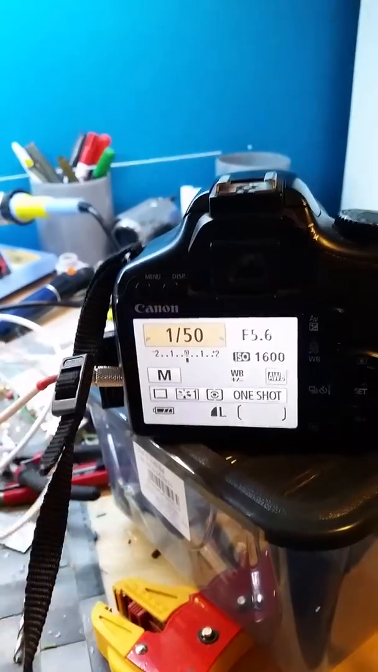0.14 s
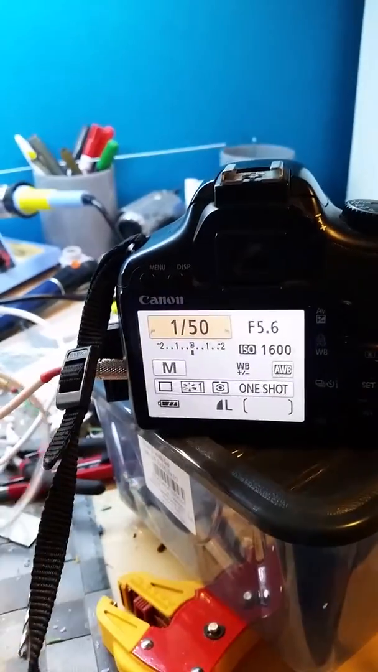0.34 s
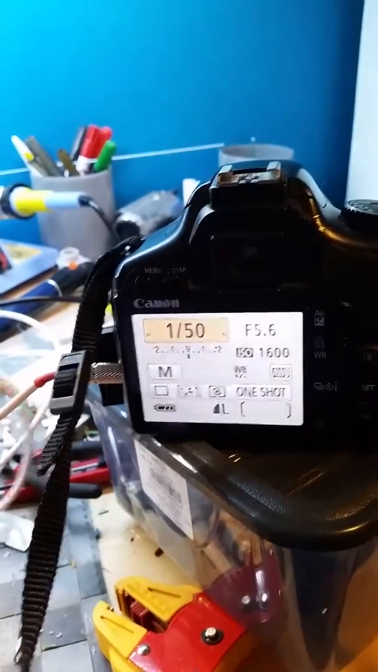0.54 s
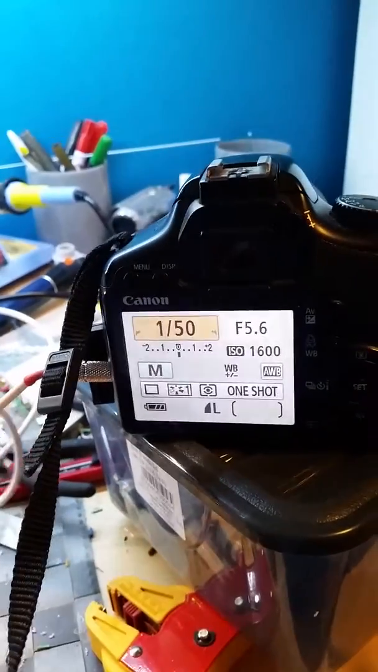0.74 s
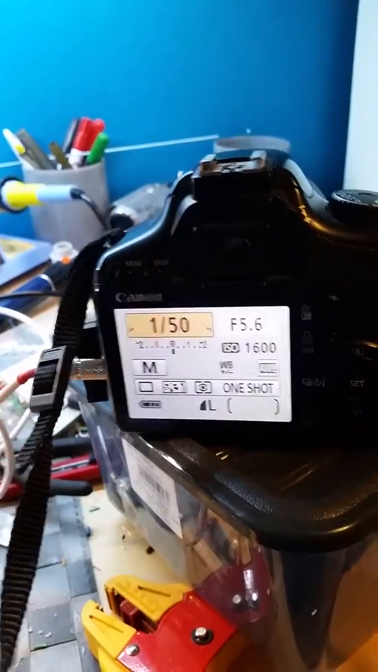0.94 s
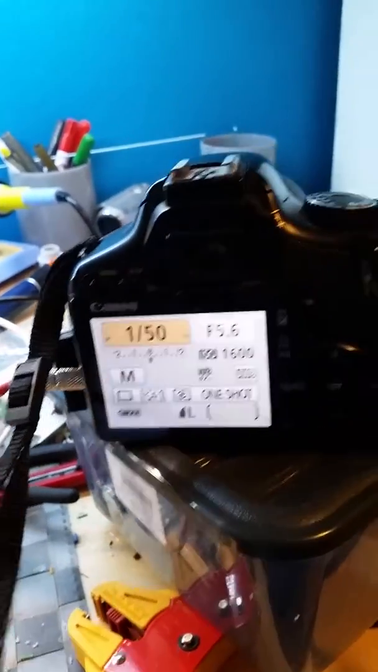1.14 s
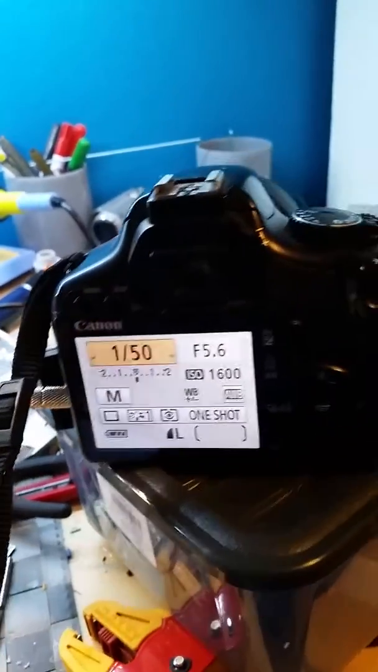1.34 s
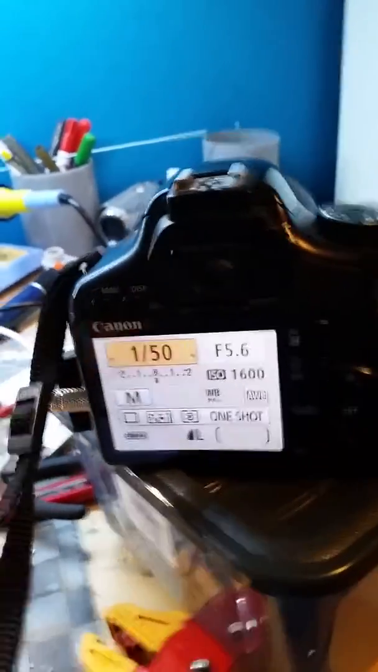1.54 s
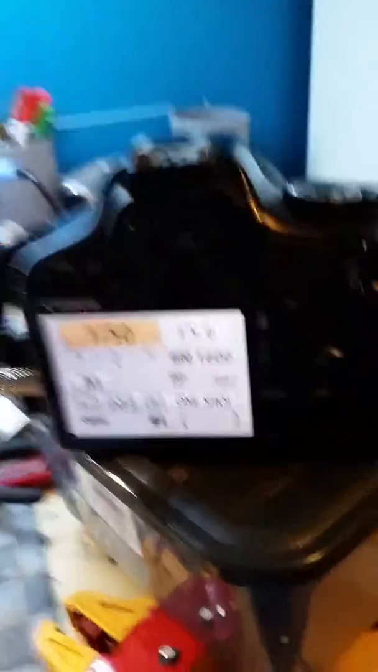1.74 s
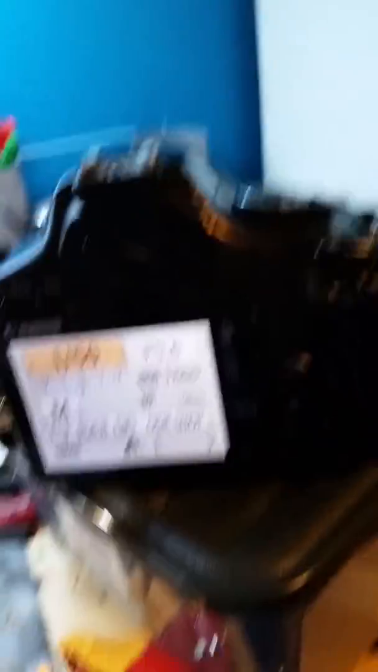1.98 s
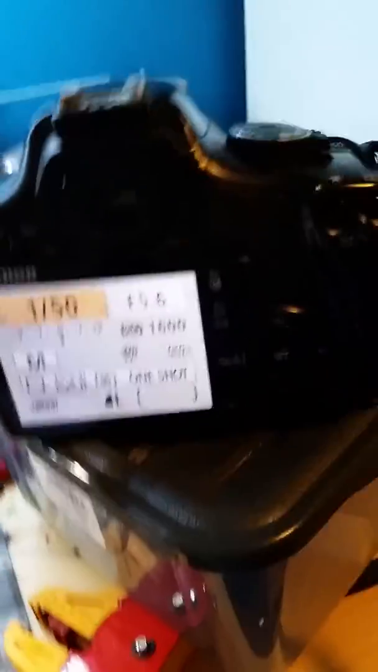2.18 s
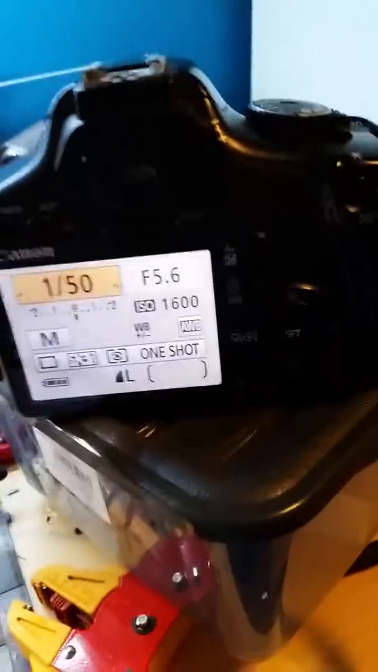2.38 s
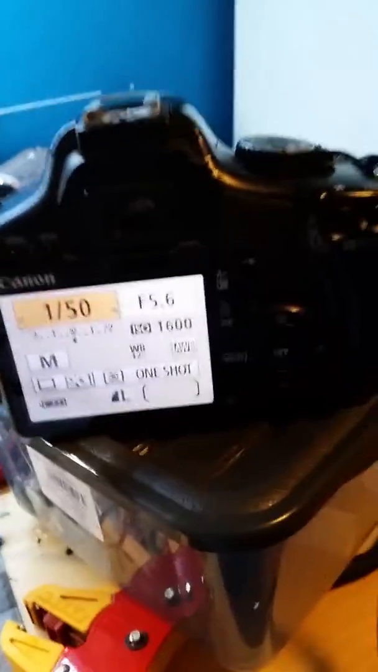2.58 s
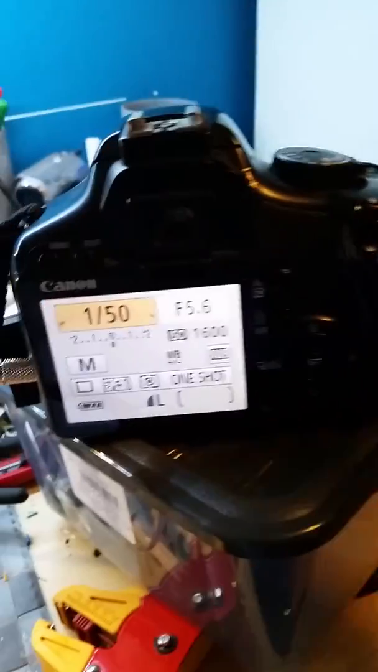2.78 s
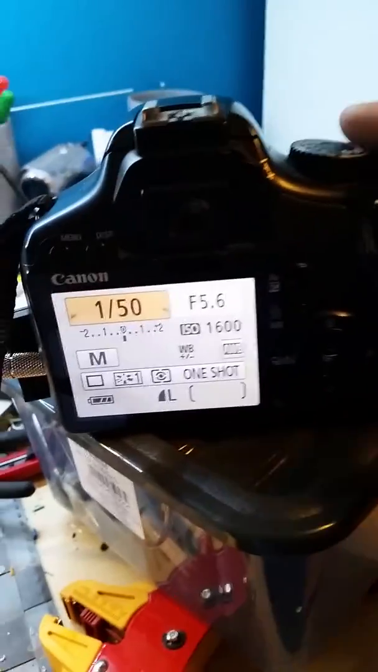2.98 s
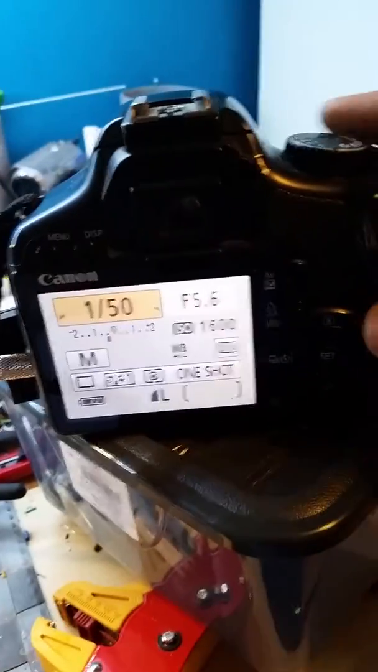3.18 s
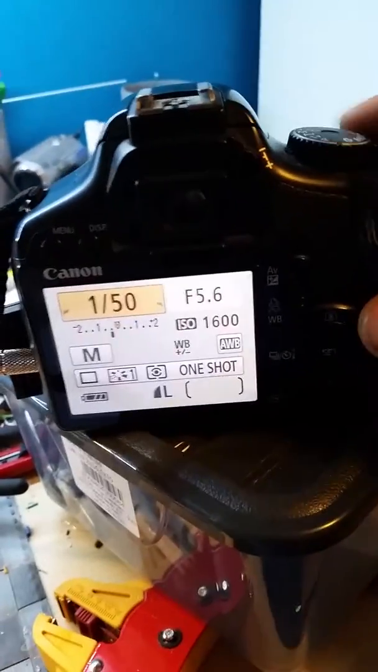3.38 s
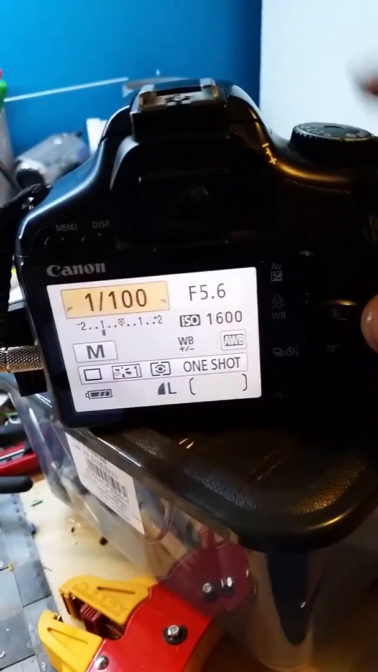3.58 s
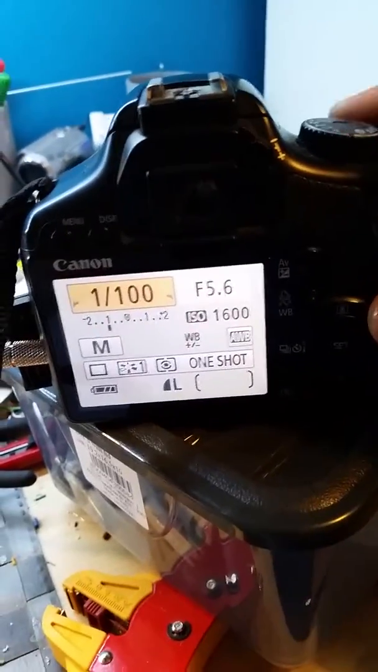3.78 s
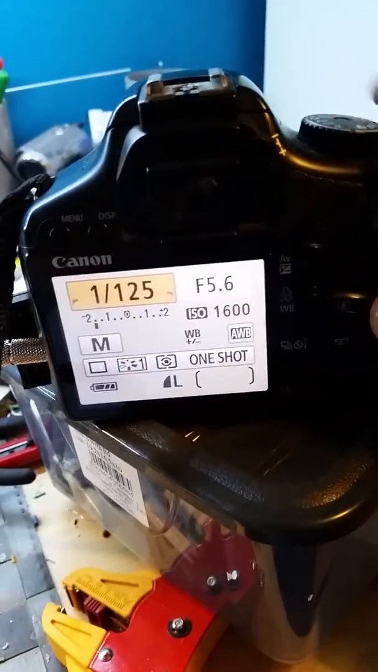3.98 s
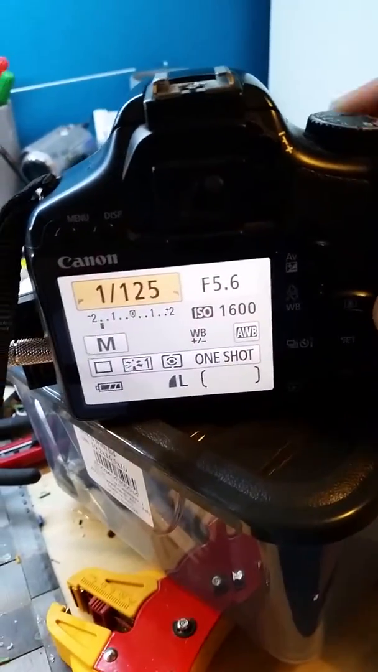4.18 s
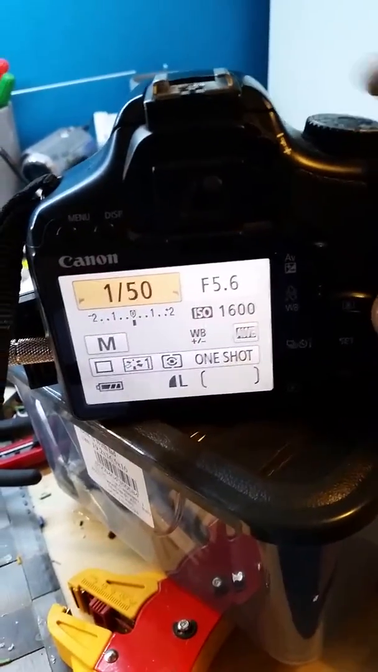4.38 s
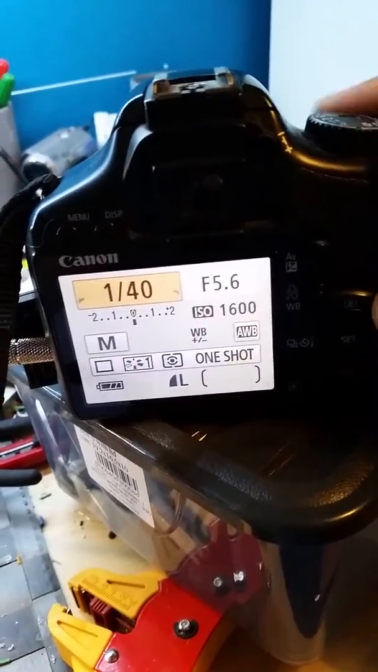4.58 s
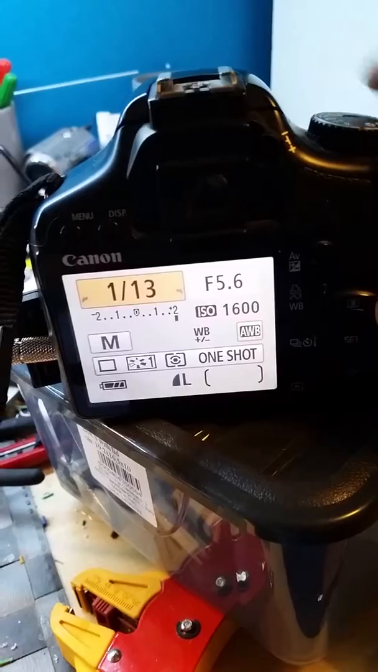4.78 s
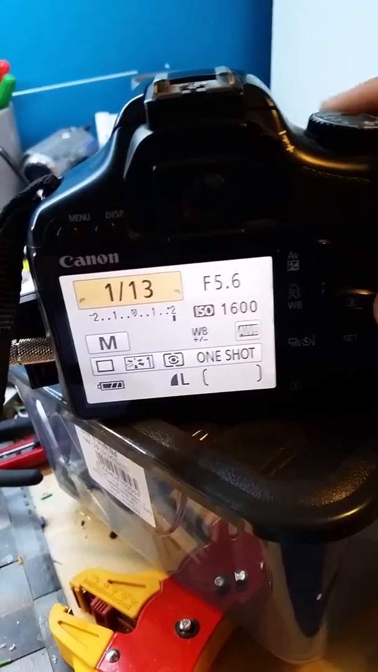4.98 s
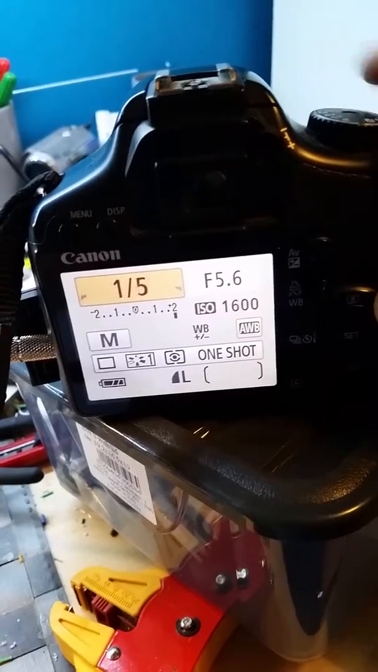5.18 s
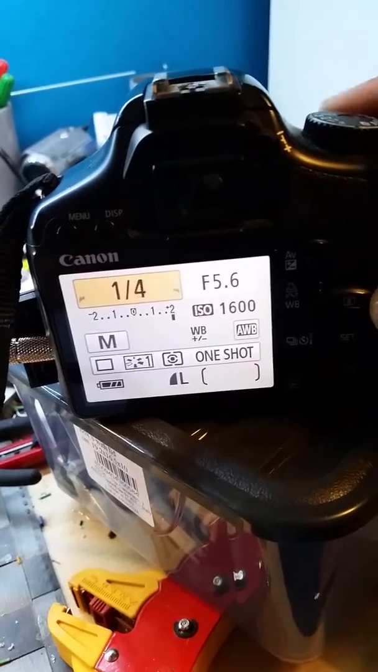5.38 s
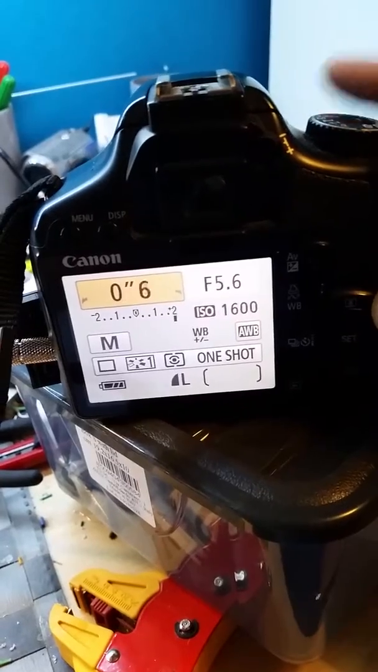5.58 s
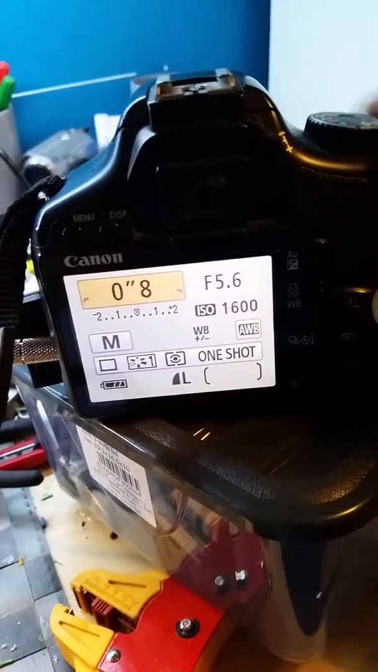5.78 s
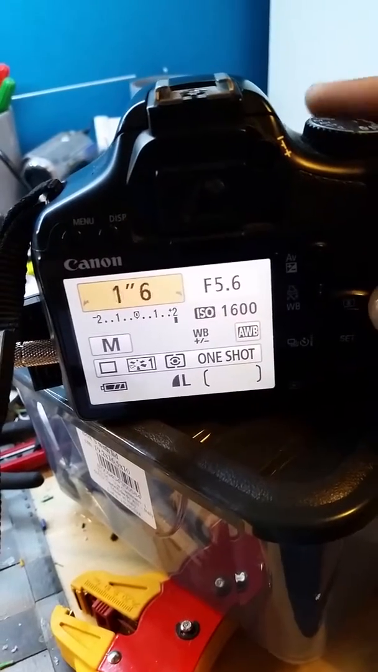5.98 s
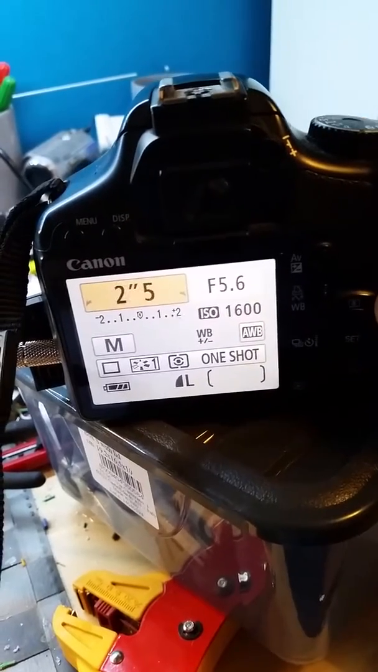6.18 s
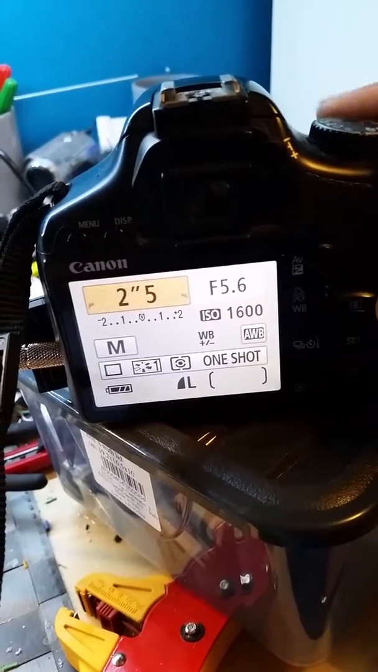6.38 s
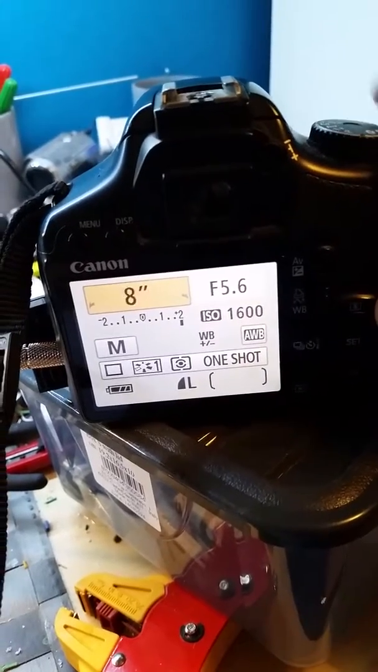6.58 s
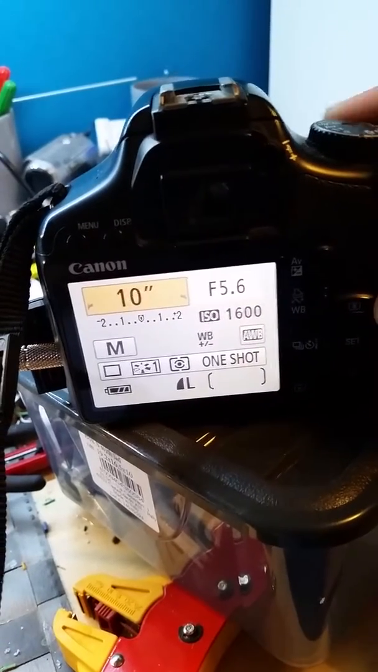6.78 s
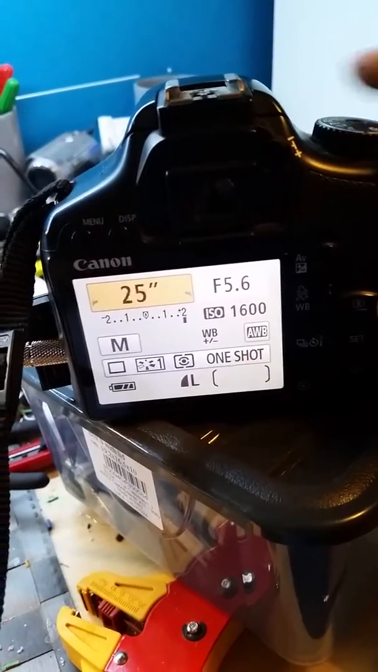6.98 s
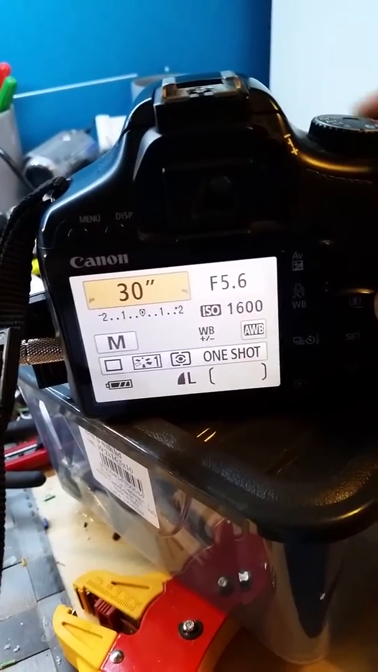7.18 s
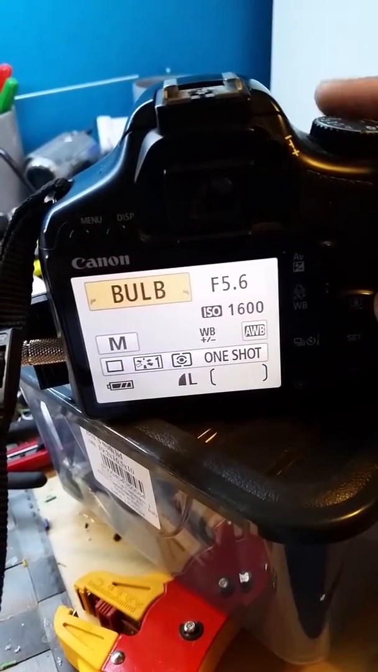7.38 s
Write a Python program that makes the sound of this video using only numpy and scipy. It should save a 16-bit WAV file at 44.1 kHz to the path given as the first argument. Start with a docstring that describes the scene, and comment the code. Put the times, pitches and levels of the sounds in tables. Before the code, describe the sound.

A hollow tub is tapped, the hand-held microphone is rubbed and bumped, then a control dial clicks round in quick short bursts.

```python
"""Room rumble, a wavering hum and microphone hiss lie under everything heard by a hand-held phone's two ports.
First a camera standing on a hollow plastic tub is tapped: the tub booms and its lid rattles.
Then fingers shift on the phone: noise slides along its shell, short swings bump it, pulses pop the right port.
Pops go on while the camera's dial rolls in short runs of clicks, each a snap that rings camera, lid, tub and room.
Near the end a finger drags once on the camera, a short burst of rough noise."""
import sys
import numpy as np
from scipy.fft import rfft, irfft, next_fast_len
from scipy.io import wavfile
from scipy.ndimage import map_coordinates

SR = 44100
rng = np.random.default_rng(int(sys.argv[2]) if len(sys.argv) > 2 else 0)


def generate_wav(signal):
    """Clip the signal to [-1, 1] and save it as 16-bit WAV at the path in sys.argv[1]."""
    frames = np.transpose(np.atleast_2d(signal))
    scaled = np.clip(frames, -1, 1) * 32767
    pcm = np.round(scaled).astype(np.int16)
    wavfile.write(sys.argv[1], SR, pcm)


N = 328104  # length in samples


def amp(db):
    """Turn a level in dB into a gain."""
    return 10 ** (np.asarray(db) / 20)


def unit(x):
    """Scale x to an rms of 1."""
    return x / np.sqrt(np.mean(x ** 2) + 1e-20)


def along(points, hz):
    """Read each column after the frequency, on a log frequency axis."""
    f, *columns = np.transpose(points)
    return np.array([np.interp(np.log(hz + 1), np.log(f + 1), column) for column in columns])


def curves(rows):
    """Draw each column after the time as one value per sample."""
    s, *columns = np.transpose(rows)
    return [np.interp(np.arange(N) / SR, s, column) for column in columns]


def wobble(rate):
    """Draw a smooth random curve through rate random points a second."""
    points = rng.standard_normal(int(N * rate / SR) + 4)
    return map_coordinates(points, [np.arange(N) * rate / SR])


def shape(start, end, rise, fall):
    """A gain that climbs rise dB/s until start, holds, and drops fall dB/s after end."""
    t = np.arange(N) / SR
    return amp(-np.abs(rise) * np.maximum(start - t, 0) - np.abs(fall) * np.maximum(t - end, 0))


def filtered(x, response):
    """Multiply the spectrum of x by a response that depends on frequency."""
    m = next_fast_len(N + SR // 2)
    return irfft(rfft(x, m) * response(np.fft.rfftfreq(m, 1 / SR)), m)[..., :N]


def noise(spectrum):
    """Coloured noise, unrelated at the two ports, with a joint rms of 1."""
    return unit(filtered(rng.standard_normal((2, N)), lambda hz: amp(along(spectrum, hz))))


def add(track, s, sound):
    """Mix a short sound into the track at s seconds."""
    part = track[..., round(s * SR):round(s * SR) + sound.shape[-1]]
    part += sound[..., :part.shape[-1]]


def sides(pan_db):
    """Left and right gains; pan_db is left minus right."""
    return amp(np.array([pan_db, -pan_db]) / 2)


def ring(modes, t, scatter_db):
    """A struck object sounds several fading tones, with new random phases for every blow."""
    hz, left_db, right_db, t60, rise = np.transpose(modes)[..., None]
    level = np.array([left_db, right_db]) + scatter_db * rng.standard_normal((2,) + hz.shape)
    detune = 1 + 0.028 * rng.standard_normal(hz.shape)  # each tone's pitch varies at random from blow to blow
    wave = np.sin(2 * np.pi * (hz * detune * t + rng.random((2,) + hz.shape)))
    envelope = amp(level - 60 * t / t60) * (1 - np.exp(-t / rise))
    return np.sum(envelope * wave, axis=1)


# Rumble and hiss over time, relative levels: start_s, rumble_db, hiss_db
GROUND_LEVELS = [(0, -60.5, -79.5), (.45, -62.5, -76.5), (.75, -46.5, -67.5), (1.12, -57, -73.5),
                 (1.75, -53, -73.5), (2.1, -42.5, -60), (2.28, -44, -66), (2.4, -53.5, -77),
                 (3.02, -61, -84.5), (3.44, -53.5, -83), (3.65, -51.5, -73), (4.39, -53, -67.5),
                 (5.6, -55.5, -73), (6.38, -48, -67), (6.55, -55, -69.5), (7.25, -58.5, -74.5),
                 (7.44, -47.5, -71)]
# Colour of the rumble: pitch_hz, left_db, right_db
RUMBLE_COLOUR = [(24.9, -15.5, -0.5), (50.4, -8, 0), (86, -1, 0.5), (120.2, 0, 0), (170, -6, -3),
                 (270, -2, -1), (378, -10.5, -9), (506, -21, -15.5), (778, -28.5, -23), (1130, -34, -34.5)]
# Colour of the hiss: pitch_hz, left_db, right_db
HISS_COLOUR = [(665, -12, -9), (1350, -26, -21.5), (1873, -5, -10.5), (2740, -14, -14.5), (3190, -20, -17),
               (3820, 5.5, -8), (4626, -17, -16), (6200, -35.5, -27.5), (6470, -23.5, -16),
               (9000, -20.5, -22.5), (10000, -53, -45.5), (12000, -18, -20), (13200, -20.5, -27),
               (14400, -37, -27)]
# How alike the rumble is at the two ports: pitch_hz, likeness (1 = the same)
RUMBLE_LIKENESS = [(60, 0.16), (130, 0.73), (290, 0.94), (640, 0.38), (1400, .03)]
# Colour of the steady top of the hiss: pitch_hz, left_db, right_db
FIZZ_COLOUR = [(5100, -20, -6), (8000, -6.5, -14.5), (9830, -4.5, -4), (13000, 3, 5.5)]
# Colour of the swelling hiss near 2 kHz: pitch_hz, left_db, right_db
SWELL_COLOUR = [(1530, -25, -35), (1950, 3, -10), (2400, -28, -23), (3000, -33, -34)]
# Hiss swells: peak_s, level_db
HISS_SWELLS = [(.85, -72.5), (1.45, -70.5)]
SWELL_RISE, SWELL_FALL = 120, 105  # dB/s


def ground():
    """Low noise partly shared by the ports is the room rumble; separate noise at each port is the hiss."""
    rumble_db, hiss_db = curves(GROUND_LEVELS)

    def share(hz):
        turn = np.arccos(np.clip(along(RUMBLE_LIKENESS, hz)[0], -1, 1)) / 2
        return np.array([np.cos(turn), np.sin(turn)])

    # a shared part and an opposed part, mixed to give the wanted likeness
    mid, side = filtered(rng.standard_normal((2, N)), share)
    colour = RUMBLE_COLOUR + [(4000, -74, -56.0)]
    rumble = unit(filtered(np.array([mid + side, mid - side]), lambda hz: amp(along(colour, hz))))
    rumble = amp(rumble_db - 1.0 + 2.68 * wobble(12)) * rumble
    hiss = amp(hiss_db + 3.5 + 2.03 * wobble(24)) * noise([(300, -29.5, -19.5)] + HISS_COLOUR)
    swell_gain = sum(amp(db) * shape(s, s, SWELL_RISE, SWELL_FALL) for s, db in HISS_SWELLS)
    swell = swell_gain * noise(SWELL_COLOUR)
    fizz = amp(-91.5) * noise(FIZZ_COLOUR)
    return rumble + hiss + swell + fizz


# Swells of the hum on two notes, relative levels: start_s, end_s, pitch_hz, level_db
HUM_SWELLS = [(.8, 0.987, 278, -62.5), (1.1, 1.5, 212, -64.5), (3.575, 3.856, 278, -57.5),
              (4.2, 4.35, 212, -60), (4.5, 4.884, 212, -56), (5.18, 5.4, 278, -59),
              (5.544, 5.794, 212, -59.5), (6.03, 6.35, 278, -53.5), (6.423, 6.505, 278, -55),
              (6.696, 6.792, 278, -59)]
THIN_HZ, THIN_DB = 593, -83  # a faint steady tone; its level wavers around this


def hum():
    """Low, slightly unsteady sine tones fade in and out over one faint tone that stays on."""
    t = np.arange(N) / SR
    out = amp(THIN_DB + 1.5 * wobble(7.5)) * np.sin(2 * np.pi * THIN_HZ * t + 0.4 * wobble(8))
    for start, end, hz, db in HUM_SWELLS:
        progress = np.clip((t - start) / (end - start), 0, 1)
        fade = np.sqrt(np.abs(np.sin(np.pi * progress)))
        tone = np.sin(2 * np.pi * hz * t + 0.61 * wobble(15))
        out = out + amp(db + 4.0 + 1.9 * wobble(14)) * fade * tone
    return out


# Bumps on the phone's shell, relative levels:
# start_s, level_db, pitch_hz, direction (push 1, pull -1), left_minus_right_db, crack_db
SHELL_BUMPS = [(1.631, -28, 63, 1, -21, -55), (1.642, -28, 115, 1, 17, -47),
               (1.654, -25, 252, -1, 8.5, -57), (1.707, -21.5, 117, -1, 11.5, -36.5),
               (1.7246, -29, 64.5, 1, 9.5, -54.5), (1.762, -29, 220, 1, 11, -54),
               (1.803, -22, 326, -1, 4.5, -36.5), (1.8862, -27, 252, 1, 8, -34.5),
               (1.895, -27.5, 109, 1, 9.5, -59), (1.929, -31, 170, -1, 7, -55),
               (2.088, -29.5, 141, 1, -18.5, -45), (2.172, -18, 210, 1, 6.5, -36.5),
               (2.2501, -23, 262, 1, 13.5, -44), (2.2553, -46, 830, 1, -15.5, -26.5),
               (2.6273, -55, 896, -1, -8, -44.5), (2.6756, -26.5, 481, 1, -8, -56)]


def bumps():
    """A bump swings the shell for a few cycles and adds a short crack of noise."""
    out, cracks, t = np.zeros((2, N)), np.zeros((2, N)), np.arange(SR // 10) / SR
    for s, db, hz, direction, pan_db, crack_db in SHELL_BUMPS:
        swing = np.sin(2 * np.pi * hz * t) * amp(-60 * (hz * t / 3.9) ** 1.3)  # 60 dB down after 3.9 cycles
        add(out, s, np.sign(direction) * amp(db) * sides(pan_db)[:, None] * swing)
        burst = amp(crack_db - 60 * t / 0.012) * rng.standard_normal((2, len(t)))
        add(cracks, s, sides(0.51 * pan_db)[:, None] * burst)  # the crack is less one-sided
    return out + filtered(cracks, lambda hz: amp(8) / (1 + 1j * hz / 1200) + amp(-24))


# Skin slides on the shell: full_from_s, full_until_s, scrape_db, swish_db
SLIDES = [(1.65, 1.653, -41, -66), (1.717, 1.711, -46.5, -76), (1.891, 1.977, -44.5, -55.5),
          (1.993, 2.073, -39, -42.5), (2.096, 2.159, -42.5, -51), (2.169, 2.222, -37.5, -41),
          (2.298, 2.349, -47.5, -53.5), (2.583, 2.598, -50.5, -62)]
# Colour of the thuds: pitch_hz, left_db, right_db
THUD_COLOUR = [(25, -8.5, -11.5), (50, -8, -9.5), (100, 3, 3), (200, 1.5, -4.5), (350, 3, -17),
               (500, -11, -13.5), (788, -26.5, -25.5), (1330, -16, -29)]
# Colour of the scrape: pitch_hz, left_db, right_db
SCRAPE_COLOUR = [(200, 2.5, -23), (480, 0, -11.5), (1300, -12.5, -20.5), (2020, -14, -18),
                 (3060, -24.5, -24.5), (3830, -11, -18.5), (4770, -24.5, -21), (5300, -56, -30),
                 (7000, -59, -35.5)]
# Colour of the swish: pitch_hz, left_db, right_db
SWISH_COLOUR = [(4580, -46, -15.5), (6200, -40.5, -7.5), (6900, -4.5, -2), (9040, -0.5, -7),
                (11000, -2, -1), (14400, 2, 3)]
# Colour of the finger dragging on the camera: pitch_hz, left_db, right_db
DRAG_COLOUR = [(300, -9, -8), (690, 0, 3), (1600, -3.5, -2), (3200, -10, -5), (6300, -29, -28)]
SLIDE_RISE, SLIDE_FALL = 690, 610  # dB/s
RIGHT_SWISH_DB = 5.5  # the right port hears more swish
GRIP_THUD_DB, GRIP_SCRAPE_DB, GRIP_SWISH_DB = -45, -58, -68.5
GRIP_DRIFT_DB_PER_S = -21  # the thuds drift from left to right


def rubbing():
    """Sliding skin makes lumpy thuds, a rough scrape and a bright swish from unsteady noise."""
    grip = shape(1.716, 2.573, rise=310, fall=130)  # the hand is restless on the phone
    slides = np.array([shape(start, end, SLIDE_RISE, SLIDE_FALL) for start, end, *_ in SLIDES])
    scrape_db, swish_db = np.transpose(SLIDES)[2:]

    pan_db = GRIP_DRIFT_DB_PER_S * (np.arange(N) / SR - 2.0)
    lumps = amp(7.5 * np.array([wobble(40), wobble(40)]))
    thud = unit(lumps * noise(THUD_COLOUR + [(2510, -61.5, -71.5)]))
    thud = amp(GRIP_THUD_DB) * grip * sides(pan_db) * thud

    # skin sticks and slips, strongest at the left port
    rough = amp([[1], [.4]] * (2.17 * wobble(180) + 1.86 * wobble(40)))
    scrape_gain = amp(scrape_db) @ slides + amp(GRIP_SCRAPE_DB) * grip
    scrape = scrape_gain * unit(rough * noise(SCRAPE_COLOUR))

    left, right = amp(0.5 * wobble(300) + 1.3 * wobble(31.34)) * noise(SWISH_COLOUR)
    swish_gain = amp(swish_db) @ slides + amp(GRIP_SWISH_DB) * grip
    swish = swish_gain * [unit(left), amp(RIGHT_SWISH_DB) * unit(right)]

    drag_gain = amp(-45) * shape(6.47, 6.472, rise=420, fall=118)
    drag = drag_gain * unit(amp(2.4 * wobble(120)) * noise(DRAG_COLOUR))
    return thud + scrape + swish + drag


# Skin slips over the right port, relative levels: peak_s, level_db, width_ms (time scale of the pulse)
PORT_SLIPS = [(2.2778, -8, 0.077), (2.321, -17.5, 0.7), (2.41, -8, 0.12), (2.467, -12.5, 0.12),
              (2.5738, -18.5, 0.13), (2.5806, -28, 0.53), (2.5897, -29, 1.2), (2.5964, -22.5, 0.43),
              (2.5994, -22.5, .8), (2.6039, -18, 0.35), (2.64, -21, 0.45), (2.6768, -24, 0.66),
              (2.716, -27.5, 1.8), (2.966, -27.5, 1.94), (3.064, -25.5, 1.67), (3.0925, -26, 1.2),
              (3.123, -26, 1.3), (3.2464, -25, 1.3), (3.269, -26, 1.35), (3.287, -28.5, 1.3),
              (3.3226, -27, 1.24), (3.3574, -26.5, 1.4), (3.6126, -20.5, 0.92), (3.646, -20.4, 0.72),
              (4.0609, -21, 1.25), (4.166, -19.5, 1.2), (4.3386, -20.5, 0.8), (4.3548, -20.9, 0.7),
              (4.3792, -21, 0.63), (4.485, -21.5, 0.8), (4.548, -20, 0.78), (4.7353, -18.5, 0.64),
              (4.7562, -20.5, 0.65), (5.1303, -21, 0.74), (5.162, -21, 0.93), (5.7117, -21, 1.04),
              (5.7366, -22, 1), (6.0381, -19.5, 0.79), (6.2604, -20.5, 0.7), (6.4697, -19, 0.86),
              (6.9952, -20.5, 0.65), (7.0752, -22, 0.77)]
# Colour of a snap: pitch_hz, left_db, right_db
SNAP_COLOUR = [(1000, -13.5, -5.5), (4000, 5, -4.5), (6500, -16.5, -0.5), (10000, 1, 1), (13570, -4.5, 9)]
# a run of quick, even slips
CHATTER_S, CHATTER_GAP_S, CHATTER_DB, CHATTER_MS, CHATTER_SLIPS = 2.6082, .00433, -22, 0.89, 4


def low_cut(hz):
    """The recorder takes away the lowest pitches in two stages."""
    gentle = 1j * hz / (70 + 1j * hz)
    steep = -hz * hz / (90 ** 2 - hz * hz + 1j * hz * 95)
    return gentle * steep


def through_shell(hz):
    """The shell passes a band around 430 Hz on to the left port."""
    return amp(-12.0) * 1j * hz * 250 / (430 ** 2 - hz * hz + 1j * hz * 250)


def pops():
    """A slip sucks air from the right port: a one-way pulse that the low cut turns into a swing back."""
    suck, snaps, t = np.zeros(N), np.zeros((2, N)), np.arange(-300, 2400) / SR
    chatter = [(CHATTER_S + k * CHATTER_GAP_S, CHATTER_DB + rng.normal(0, 1.8), CHATTER_MS)
               for k in range(CHATTER_SLIPS)]
    for s, db, width_ms in PORT_SLIPS + chatter:
        u = t / (width_ms / 1000)
        before = np.exp(-np.abs(u / 0.56) ** 1.28)
        after = np.exp(-np.abs(u / 5.3) ** 0.94)
        add(suck, s + t[0], -amp(db + 4.0) * np.where(u < 0, before, after))
        snap_db = db - 11.0 - 45 * width_ms  # only sudden slips snap
        add(snaps, s + t[0], amp(snap_db - 60 * np.abs(t) / 0.0034) * rng.standard_normal((2, len(t))))
    right = filtered(suck, low_cut)
    left = filtered(right, through_shell)
    return np.array([left, right]) + filtered(snaps, lambda hz: amp(along(SNAP_COLOUR, hz)))


# Tones of the hollow tub: pitch_hz, level_db, t60_s (time to fade by 60 dB)
TUB_TONES = [(68.6, -7, 0.17), (119.7, 5.5, 0.31), (167, -6, 0.3), (221.4, -8.5, 0.23), (314, 1, 0.061),
             (392, -5.5, 0.11), (582, -22, 0.13), (850, -13, 0.063)]


def tub(t, rise):
    """The hollow tub booms after one blow: low tones that swell quickly and fade."""
    tones = 0
    for hz, db, t60 in TUB_TONES:
        tones = tones + amp(db + rng.normal(0, 1) - 60 * t / t60) * np.sin(2 * np.pi * hz * t)
    return tones * (1 - np.exp(-t / rise))


# Taps on the tub, relative levels: start_s, level_db, scuff_db (on top of level_db)
TUB_TAPS = [(0.6186, -25.5, -18.5), (.705, -46.5, -2.5), (0.7228, -31, -11.5)]
# Tones of the tub's lid: pitch_hz, left_db, right_db, t60_s, rise_s
LID_TONES = [(357.6, -18.5, -16.5, 0.065, 0.0052), (588, -30.5, -36.5, 0.041, .002),
             (891, -22, -19.5, 0.037, 0.0027), (1303, -28.5, -58, 0.022, 0.00089)]


def taps():
    """Finger taps boom in the tub and rattle its lid, with a bright scuff of fading noise."""
    out, scuffs, t = np.zeros((2, N)), np.zeros((2, N)), np.arange(SR // 2) / SR
    for s, db, scuff_db in TUB_TAPS:
        boom = amp(db - 3.5) * tub(t, rise=0.0039)
        rattle = amp(db) * ring(LID_TONES, t, scatter_db=3.5)
        add(out, s, boom + rattle)
        fade = amp(-60 * t / 0.042) + amp(-18.5 - 60 * t / .5)  # a quick part and a faint slow part
        add(scuffs, s, amp(db + scuff_db) * fade * rng.standard_normal((2, len(t))))
    bright = [(1500, -8.5), (5000, 4), (12000, -3.0)]  # pitch_hz, level_db
    return out + filtered(scuffs, lambda hz: amp(along(bright, hz)))


# Clicks of the dial, relative levels: start_s, level_db
CLICKS = [(3.4365, -44.5), (3.4638, -38), (3.5025, -34), (3.8503, -36), (4.184, -26.5), (4.2059, -26.5),
          (4.2351, -22), (4.2631, -23.5), (4.3182, -22.5), (4.5876, -25.5), (4.6007, -20.5),
          (4.6137, -21.5), (4.6285, -24.5), (4.6726, -21.5), (4.7377, -47), (4.9861, -28.5), (4.9995, -25),
          (5.017, -24), (5.048, -25.5), (5.1269, -22), (5.4084, -27.5), (5.4208, -23.5), (5.4346, -23.5),
          (5.4635, -26), (5.5472, -25.5), (5.8648, -28), (5.877, -25), (5.8954, -24.5), (5.9219, -23),
          (5.9876, -23.5), (6.339, -25), (6.351, -20.5), (6.3656, -25.5), (6.38, -23.5), (6.4274, -23),
          (6.5066, -24.5), (6.7871, -28), (6.7998, -27), (6.818, -24), (6.846, -24.5), (6.9205, -25.5),
          (7.2495, -30), (7.2602, -28), (7.28, -25), (7.3092, -25), (7.3696, -26.5)]
# Runs of clicks, each with its own ring and knock, relative levels: start_s, body_ring_db, first_tub_knock_db
CLICK_RUNS = [(3.43, -27.5, 4), (3.84, -25.5, 11.5), (4.18, -23.5, 0), (4.58, -23, 3), (4.73, -22, 14),
              (4.98, -24.5, 5), (5.4, -25.5, 2), (5.86, -27.5, 4.5), (6.33, -22.5, 4), (6.5, -18.5, -15),
              (6.78, -24.5, 6), (7.24, -27, -0.5)]
# Tones of the dial: pitch_hz, left_db, right_db, t60_s, rise_s
DIAL_TONES = [(6610, -31, -15, .012, 0.00031), (8060, -10, -34.5, 0.014, 0.00063),
              (9090, -3, -16, 0.011, 0.0001), (10940, -14.5, -29, 0.0073, 0.00018),
              (11960, -8.5, -13.5, 0.013, 0.0001), (13560, -14.5, -16.5, 0.015, 0.00014),
              (14870, -10, -7, .01, .0002)]
# Tones of the camera body: pitch_hz, left_db, right_db, t60_s, rise_s
BODY_TONES = [(1884, -11, -10.5, 0.02, 0.0048), (2064, -8, -23, 0.017, 0.0043),
              (2570, -34, -26, 0.01, 0.0024), (3934, -17.5, -18, 0.0077, 0.00031)]
# Echoes from desk and wall: delay_s, left_db, right_db
CLICK_ECHOES = [(.0035, -12, -10), (.0095, -15, 0)]
# Colour of the room's answer to a click: pitch_hz, left_db, right_db
ROOM_COLOUR = [(200, -21, -21), (700, -6.5, -6.5), (1970, -1.5, -1), (3430, -7, -8.5), (5130, -13.5, -4.5),
               (7060, -11, -4), (9000, -1.5, -4.5), (10050, -19, -18), (12400, -2.5, -7), (13000, -2.5, -4),
               (14600, -32, -14)]
USUAL_DB, BODY_FOLLOWS = -25, 0.32  # the body's ring follows only this share of a click's strength
KNOCK_SAG_DB_PER_S = 140  # the finger pushes hardest at the start of a run, so the tub knock fades


def dial():
    """Each click snaps, rings the camera body, knocks lid and tub, echoes off desk and wall and fills the room."""
    near, echo, room = np.zeros((2, N)), np.zeros((2, N)), np.zeros((2, N))
    t = np.arange(SR // 2) / SR
    short = t[:SR // 10]
    room_fade = (amp(-60 * t / 0.08) + amp(-6.5 - 60 * t / 0.39)) * (1 - np.exp(-t / 0.002))
    for s, db in CLICKS:
        start, ring_db, first_db = [run for run in CLICK_RUNS if run[0] <= s + .01][-1]
        body_db = ring_db - db + BODY_FOLLOWS * (db - USUAL_DB)  # relative to the click
        knock_db = first_db - KNOCK_SAG_DB_PER_S * (s - start)

        tick = amp([[-8], [-14]] - 60 * short / 0.0029) * rng.standard_normal((2, len(short)))
        snap = ring(DIAL_TONES, short, scatter_db=0.0) + tick
        add(near, s, amp(db) * snap)
        for delay, left_db, right_db in CLICK_ECHOES:
            add(echo, s + delay, amp(db) * amp([[left_db], [right_db]]) * snap)
        # body and lid speak a moment after the snap
        add(near, s + 0.002465, amp(db + body_db + 1.5) * ring(BODY_TONES, short, scatter_db=1.5))
        add(near, s + .001, amp(db + 0.69 * knock_db + 3.5) * ring(LID_TONES, short, scatter_db=4.5))
        add(near, s, amp(db + knock_db - 25.0) * tub(t, rise=0.0042))
        add(room, s, amp(db + 0.76 * body_db - 16.0) * room_fade * rng.standard_normal((2, len(t))))
    dulled = filtered(echo, lambda hz: 1 / (1 + 1j * hz / 7000))
    return near + dulled + filtered(room, lambda hz: amp(along(ROOM_COLOUR, hz)))


def scene():
    """Everything that reaches the two ports."""
    return ground() + hum() + bumps() + rubbing() + pops() + taps() + dial()


# How the microphones fall off at both ends: pitch_hz, level_db
MICROPHONE_ROLLOFF = [(20, -10), (45, 0.5), (14600, 1), (15200, -34.5), (16000, -39.5)]
TOP_HZ = 15988  # band limit of the phone


def record(dry):
    """The microphones fall off at both ends and the phone keeps nothing above its band limit."""
    return filtered(dry, lambda hz: amp(along(MICROPHONE_ROLLOFF, hz)) * (hz < TOP_HZ))


dry = scene()
out = record(dry)
generate_wav(out)
```